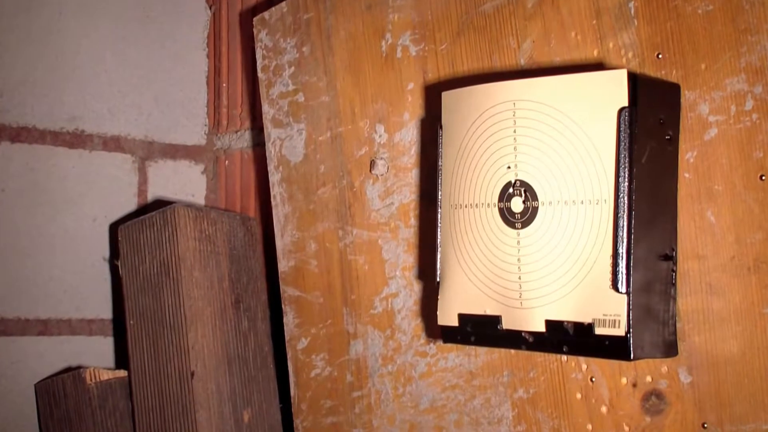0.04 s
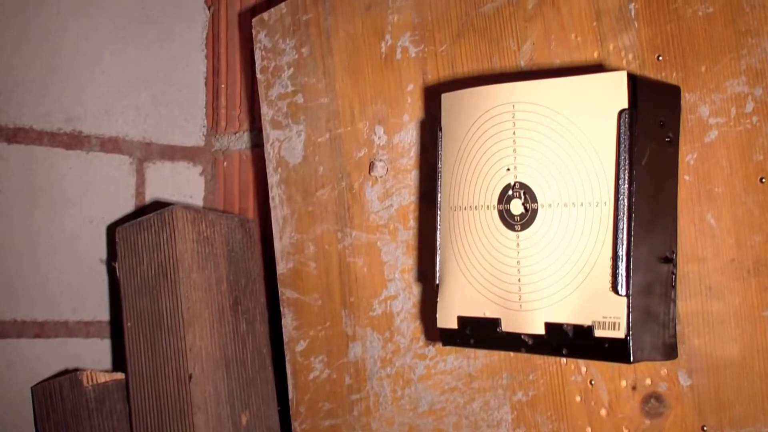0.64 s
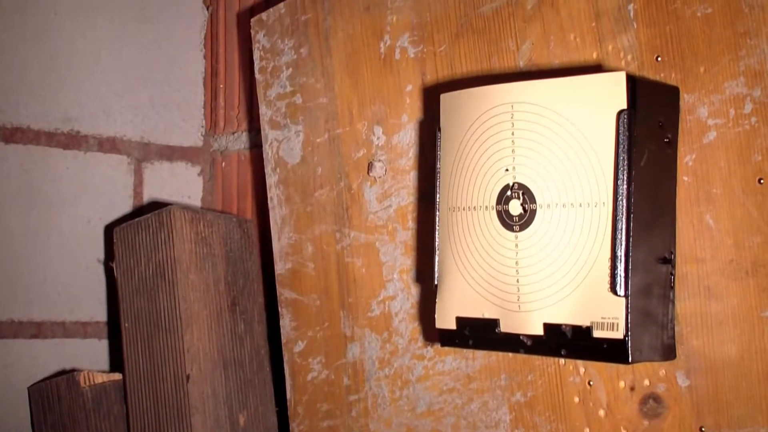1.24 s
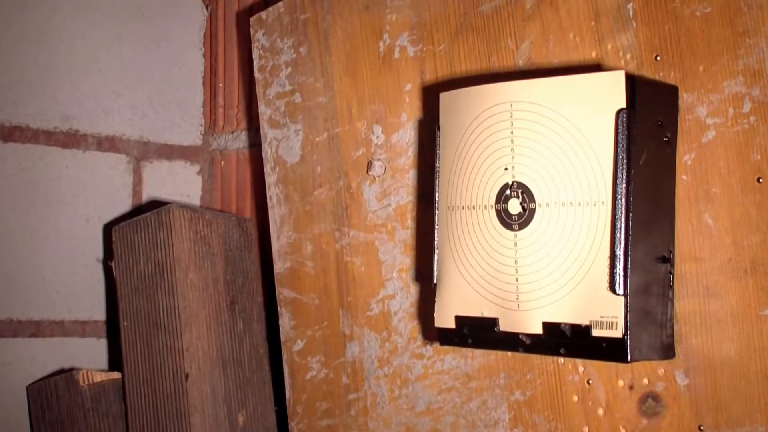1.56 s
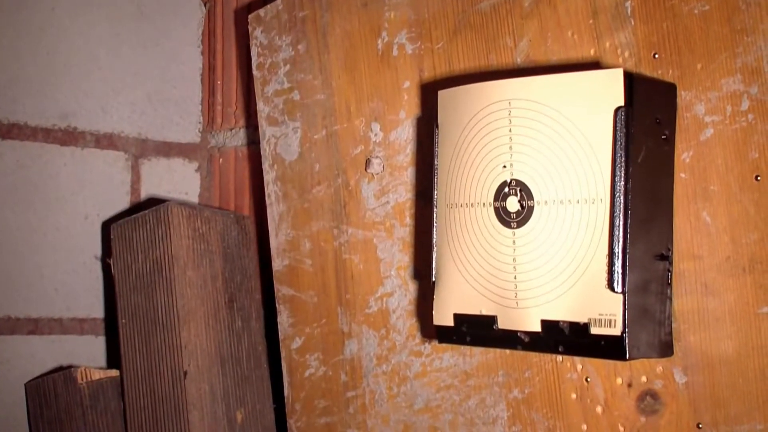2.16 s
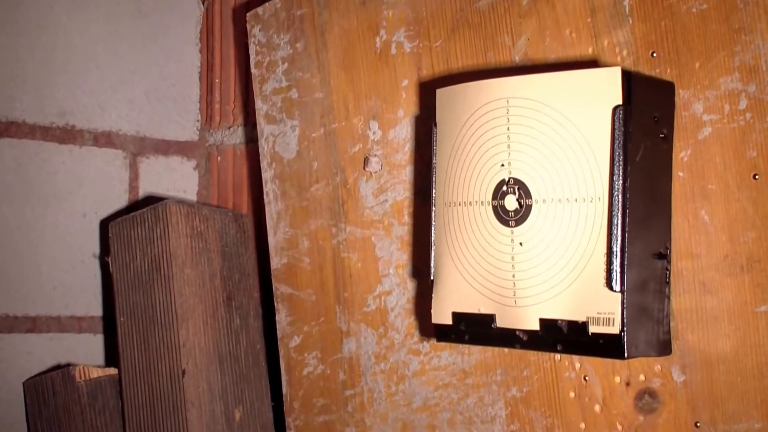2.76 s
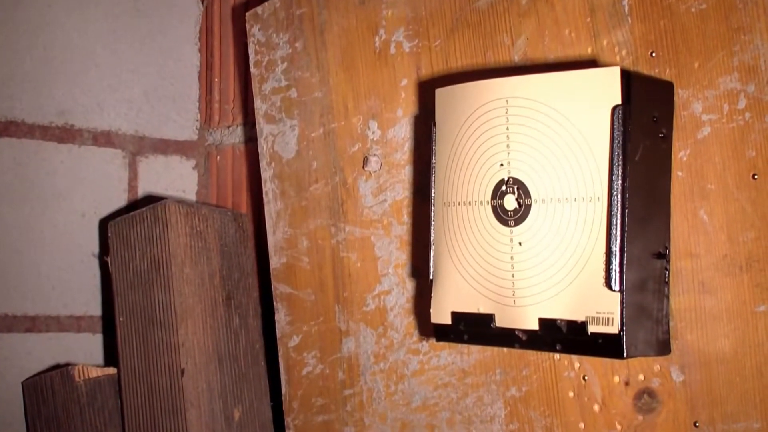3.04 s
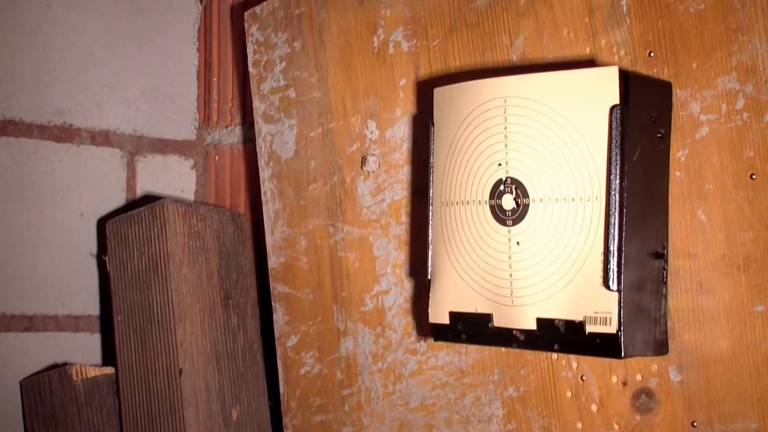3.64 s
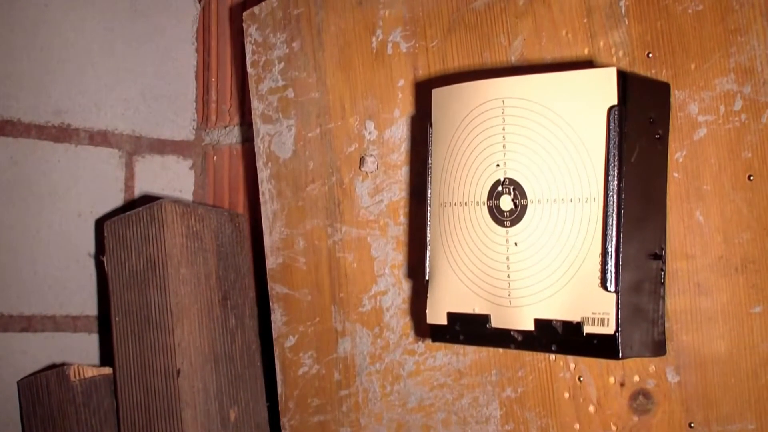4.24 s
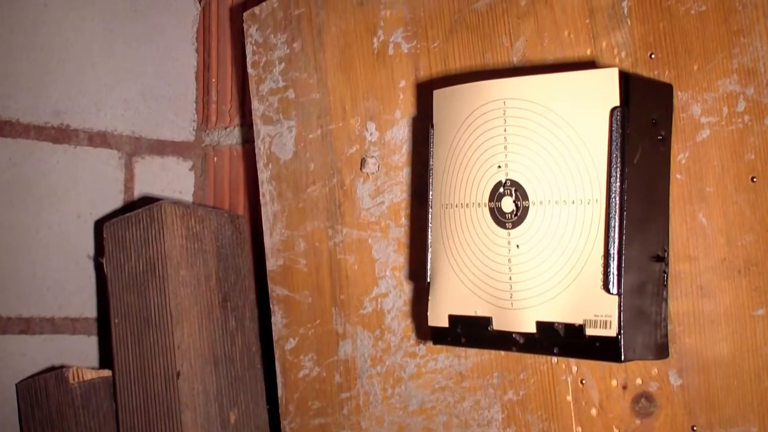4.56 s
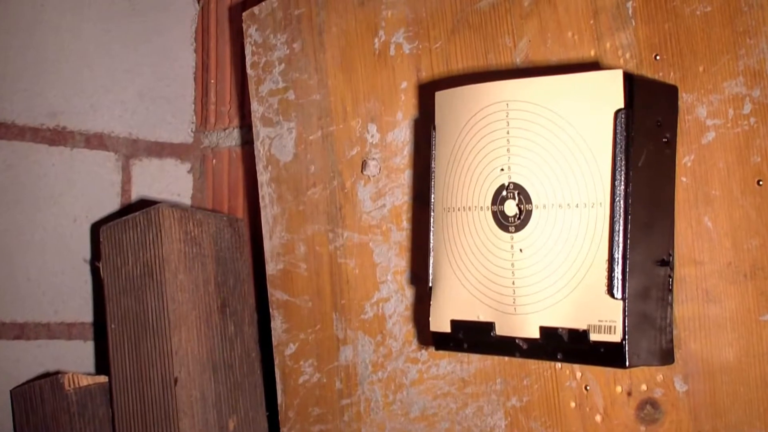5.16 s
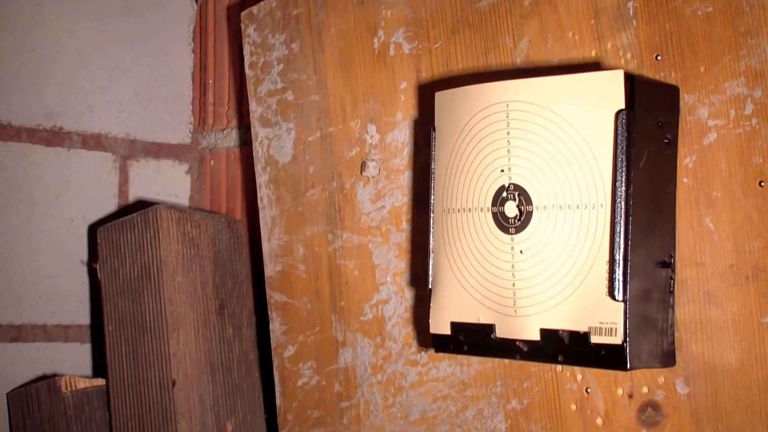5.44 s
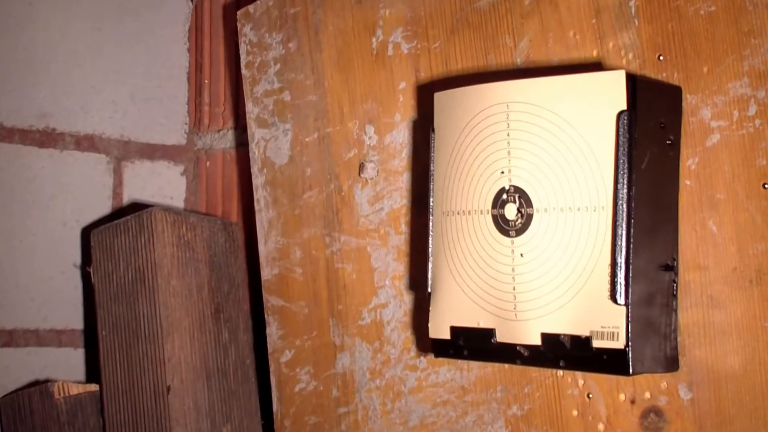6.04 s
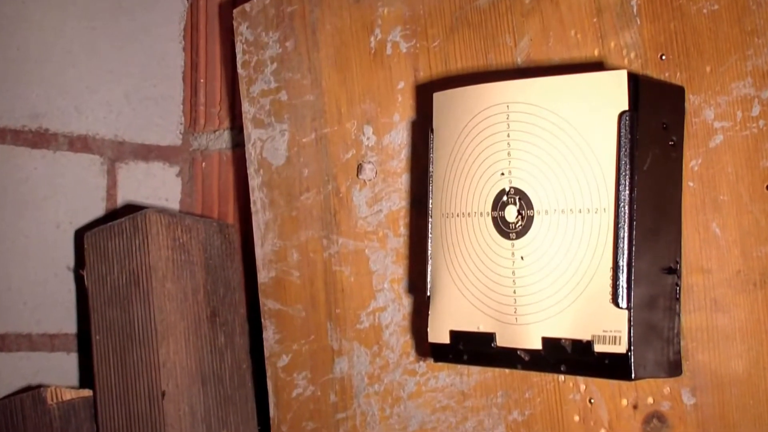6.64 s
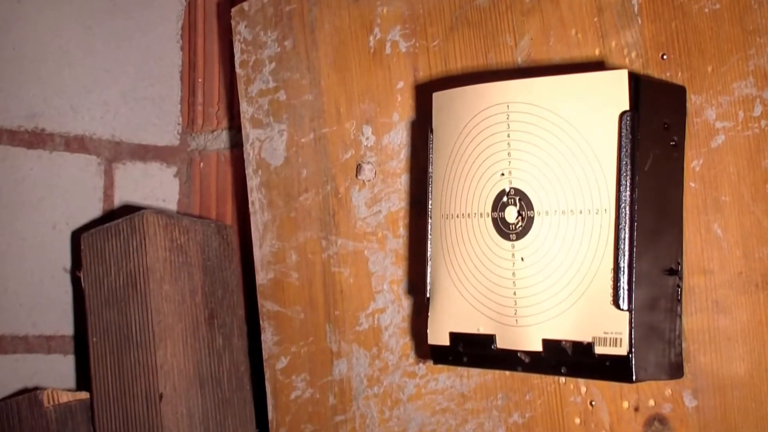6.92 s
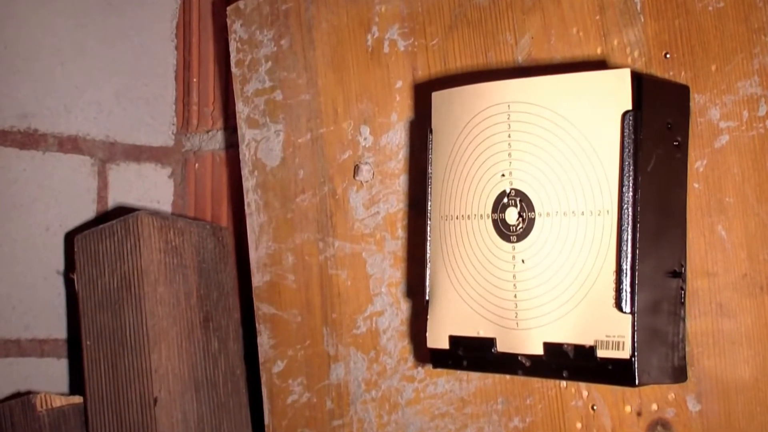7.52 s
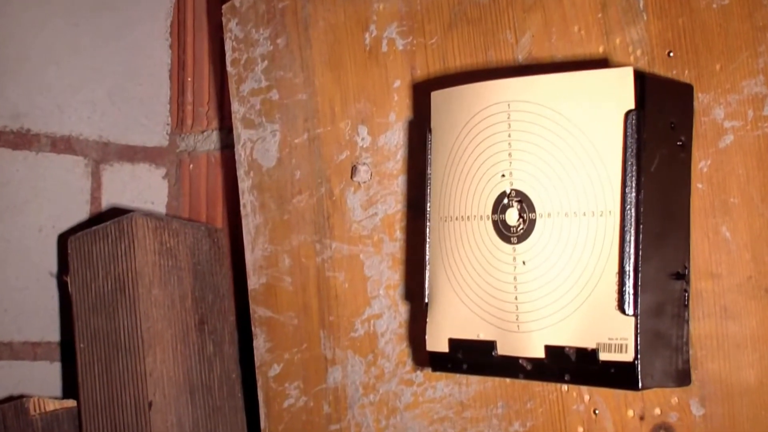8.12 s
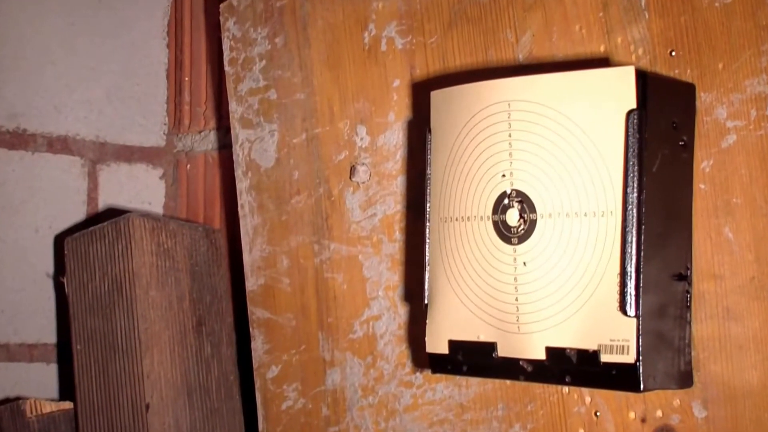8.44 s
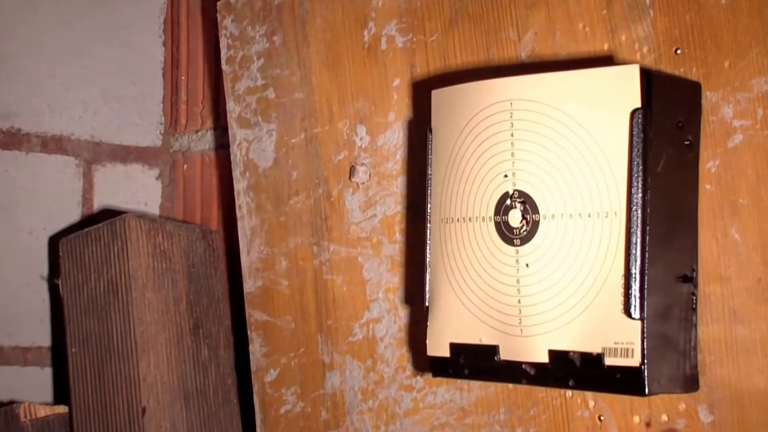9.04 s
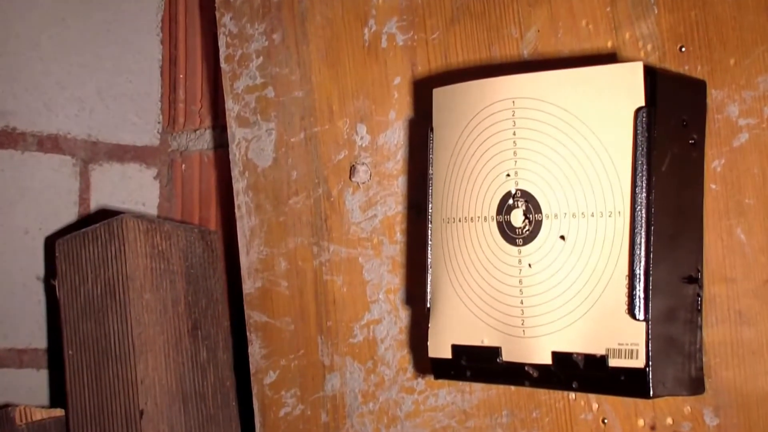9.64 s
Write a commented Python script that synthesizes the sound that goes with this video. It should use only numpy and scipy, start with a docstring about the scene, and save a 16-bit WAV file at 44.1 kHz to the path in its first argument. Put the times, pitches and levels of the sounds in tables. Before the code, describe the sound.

An air pistol fires six shots in a small brick room, heard close up, at about 0.5, 2.3, 4.3, 5.7, 7.6 and 9.1 seconds. Each begins with a small trigger click, then a sharp pop of gas merges with the loud, bright clang of a pellet striking a steel trap. The room rings briefly with a slight low boom. For about half a second after each hit, pellets bounce and rattle in the metal tray, only lightly after the third. Stray pellets tick on the hard floor and clack around the room from 1 to 1.8 seconds and again around 3 seconds, with a few small pings near 6 and 9.7 seconds. Dull knocks on wood, quieter than the shots, come at 4.8, 8.3 and 8.7 seconds. A faint low electrical hum and soft hiss run throughout.

```python
"""Gas pistol in a small brick room

Six shots: each is a trigger click, a pop of gas and a pellet slamming into a sheet-steel trap.
Pellets rattle in the trap and skip away over floor and furniture. Three dull knocks on wood sound
close by, over mains hum and hiss. A limiter ducks at every shot and lets the room's ring swell back."""
import sys
import numpy as np
from scipy.fft import rfft, irfft, next_fast_len
from scipy.io import wavfile
from scipy.ndimage import uniform_filter1d, minimum_filter1d

SR = 44100
rng = np.random.default_rng(int(sys.argv[2]) if len(sys.argv) > 2 else 0)


def generate_wav(signal):
    """Clip the signal to [-1, 1] and save it as 16-bit WAV at the path in sys.argv[1]."""
    frames = np.transpose(np.atleast_2d(signal))
    scaled = np.clip(frames, -1, 1) * 32767
    pcm = np.round(scaled).astype(np.int16)
    wavfile.write(sys.argv[1], SR, pcm)


N = 435708
TOP_HZ = 15900  # highest frequency kept
SPAN = 32768  # samples in one hit with its echo
T, HZ = np.arange(SPAN) / SR, np.fft.rfftfreq(SPAN, 1 / SR)  # that hit's times and frequencies

# the shots: trigger t/s, shot t/s, pop level/dB, ring of the trap's tray/dB
SHOTS = [(0.364, 0.5141, 17, 2.5), (2.231, 2.3207, 15.5, -2), (4.2, 4.2661, 16.5, -8.5),
         (5.653, 5.6856, 15.5, -7.5), (7.561, 7.609, 14.5, -7.5), (9.0835, 9.135, 18, -7.5)]
# tone of a hard bounce: f/Hz, level/dB
BOUNCE_TONE = [(100, -25), (400, -2.5), (1000, 5.5), (1500, 6), (3000, 5), (7000, 4), (12000, 1.5),
               (15500, 4.5)]
# tone of a bright tick: f/Hz, level/dB
TICK_TONE = [(200, -37), (1000, -17.5), (3000, -12), (7000, -8.5), (11000, -2.5), (15000, -3.5)]


def pistol():
    """The hammer opens the valve, gas pops from the ringing barrel, and the room booms."""
    # tone of the gas pop: f/Hz, level/dB
    pop_tone = [(30, 6.5), (70, 0.5), (120, -8.5), (190, -12.5), (250, 7.5), (350, -33), (480, -5.5),
                (700, -5), (1100, -0.5), (1500, -14.5), (2700, -8.5), (4000, -1), (8000, -8.5),
                (15000, -5.5)]
    out = np.zeros((2, N))
    gas = colour(along(pop_tone, HZ))
    barrel = colour(peaks([(2130, 0)], width_hz=380, lift_db=30))
    for _, s, db, _ in SHOTS:
        add(out, s - .002, amp(db - 23.5) * hit(gas, t60=.036, room_db=-15.5, rise=.00055))  # hammer
        add(out, s + .0003, amp(db + 4) * hit(barrel, t60=.039, room_db=-14, rise=.006))
        add(out, s + .00041, amp(db - 5) * hit(gas, t60=.084, room_db=-1, rise=.00031))
        add(out, s, amp(db - 18) * room_boom())
    return out


def trap_impacts(flight_s=.0182, level_db=25.5, scatter_db=1.5):
    """Each pellet slams into a new spot on the steel trap, so the ring differs a little each time."""
    # the trap's ringing notes: f/Hz, level/dB
    trap_notes = [(732, 1), (937, 5.5), (1130, -1.5), (1378, 6), (1712, -0.5), (1809, -9.5), (1906, -1.5),
                  (2003, 1), (2864, -3), (3370, -7), (3424, 8), (3639, -6.5), (3844, -2), (4016, 3),
                  (4490, 0), (4963, -1.5), (5028, 0), (6234, -9), (6309, -16.5), (6417, 9.5), (7418, -10),
                  (7784, -7.5), (8236, -3), (8355, -5), (8419, 0.5), (8484, -12), (9119, -10.5),
                  (10820, -0.5)]
    # tone of the impact: f/Hz, level/dB
    impact_tone = [(60, -43), (300, -5), (700, -7), (1400, 0.5), (3000, -3), (5000, -1.5), (8000, -5.5),
                   (11000, -4.5), (15000, -8)]
    out = np.zeros((2, N))
    high_ring = peaks([(7800, 4.7), (8400, 2.1), (10820, 2)], width_hz=90, lift_db=13)
    smack = colour(along(TICK_TONE, HZ) + high_ring)
    for _, shot_s, _, _ in SHOTS:
        notes = [(hz, db + scatter_db * rng.standard_normal()) for hz, db in trap_notes]
        steel = colour(along(impact_tone, HZ) + peaks(notes, width_hz=14 + HZ / 300, lift_db=6))
        s = shot_s + flight_s
        add(out, s, amp(level_db) * hit(steel, t60=.19, room_db=-9, rise=.0012))
        add(out, s, amp(level_db + 1.5) * hit(smack, t60=.086, room_db=-6.5))
        add(out, s, amp(level_db - 6.5) * hit(smack, t60=.12, room_db=-13.5))  # the sheets shimmer on
    return out


def trap_rattle(scatter_db=2):
    """Pellets bounce and roll in the trap's tray; harder bounces ring more and sound drier."""
    # clear bounces: t/s, strength/dB, bass/dB
    bounces = [(.6942, -3, -6), (.7387, -6.5, 13.5), (.7914, -7.5, 1.5), (0.825, 1.5, -10),
               (2.5182, 2, -25), (2.5615, -8, 9), (2.6087, 2, -4.5), (2.6234, -5, 3), (2.6498, 1, -28.5),
               (2.7458, 0, -14), (2.7852, -2.5, -11), (2.8021, -5.5, -3.5), (4.5554, -5.5, -3),
               (5.859, 7, -15.5), (5.9402, -5, 1.5), (5.9773, 10, -16), (6.0263, -0.5, -3),
               (6.0481, -1.5, -5.5), (6.1401, 0, -28.5), (7.8208, 5, -20.5), (7.8842, -4, -1.5),
               (7.9012, -6.5, -14), (9.3712, 6, -15), (9.4302, 1.5, -5.5), (9.4734, -1, 7.5),
               (9.54, -3, -2), (9.5818, -15, 7)]
    # the tray's ringing notes: f/Hz, level/dB
    tray_notes = [(920, -3), (1440, 5), (1800, -7), (2420, 1), (2780, -6), (3870, 4), (4350, -1),
                  (5150, -5), (6480, -4), (7550, 1), (7750, -4), (9950, 0), (11450, -3), (12750, 0)]
    out = np.zeros((2, N))
    for _, shot_s, _, ring_db in SHOTS:
        clear = [row for row in bounces if 0 < row[0] - shot_s < 1]
        rolling = [(shot_s + .14 + .2 * u, -21, 0) for u in rng.random(3)]  # soft random touches
        for s, db, bass_db in clear + rolling:
            # a square hit moves the whole sheet, a glancing one only its treble
            sheet = along(BOUNCE_TONE, HZ) + bass_db / (1 + (HZ / 3500) ** 2)
            lift_db = 13 + ring_db + .5 * min(db - 10, 0)  # soft touches hardly ring
            notes = [(hz, level + scatter_db * rng.standard_normal()) for hz, level in tray_notes]
            steel = colour(sheet + peaks(notes, width_hz=80 + HZ / 160, lift_db=lift_db))
            ring = hit(steel, t60=.037, room_db=-10.5 - .3 * db, rise=.001)
            snap = hit(steel, t60=.007, room_db=-20, rise=.0002)
            add(out, s, amp(db - 6.5) * ring)
            add(out, s + .001, amp(1.47 * db - 7) * snap)
    return out


def knocks():
    """Something hard cracks against a wooden board and can set the room booming."""
    # the knocks: t/s, level/dB, room boom/dB
    strikes = [(4.7925, 0, -15), (8.282, 0.5, -5.5), (8.7306, -4, -72)]
    # the board's ringing notes: f/Hz, level/dB
    wood_notes = [(250, 1.5), (595, -6), (690, -7), (850, -4), (1170, -2.5), (1460, -9.5)]
    # tone of a dull knock: f/Hz, level/dB
    knock_tone = [(60, -10), (170, -11), (260, -6), (600, 2), (1400, -1), (2000, -4.5), (2600, -15),
                  (3400, -14), (5000, -20.5), (8000, -22.5), (15000, -19.5)]
    out = np.zeros((2, N))
    wood = colour(along(knock_tone, HZ) + peaks(wood_notes, width_hz=34, lift_db=6.5))
    crack = colour(along(BOUNCE_TONE, HZ))
    for s, db, boom_db in strikes:
        add(out, s, amp(db + .5) * hit(wood, t60=.024, room_db=-8.5))
        add(out, s, amp(db - 18.5) * hit(crack, t60=.01, room_db=-23, rise=.0001))
        add(out, s, amp(boom_db) * room_boom())
    return out


def trigger():
    """The trigger catches twice before each shot: a dull touch, then a sharp click."""
    # the two catches: lead before the trigger time/s, level/dB, bass/dB
    catches = [(0.015, -38, 12), (0.0029, -11.5, -8)]
    # tone of the click: f/Hz, level/dB
    click_tone = [(200, -46.5), (700, -10), (1200, 1.5), (1800, -2.5), (2600, 3.5), (4000, 2.5), (6000, -2),
                  (10000, -1), (15000, -9.5)]
    out = np.zeros((2, N))
    for lead_s, db, bass_db in catches:
        click = colour(along(click_tone, HZ) + bass_db / (1 + (HZ / 3000) ** 2))
        for s, *_ in SHOTS:
            add(out, s - lead_s, amp(db) * hit(click, t60=.01, room_db=-1))
    return out


def bright_tick():
    """The filter for a tiny, hard contact with a very high ring."""
    return colour(along(TICK_TONE, HZ) + peaks([(12800, 0)], width_hz=1200, lift_db=8))


def floor_skips(first_hop_s=.064, shrink=.85, first_loss_db=9.5):
    """Stray pellets tick on the hard floor; one skips on in ever shorter, softer hops."""
    # the landings: t/s, level/dB, echo/dB, number of skips that follow
    landings = [(1.072, -28.5, -17.5, 0), (1.091, -7.5, -18.5, 0), (1.1885, -31, -15.5, 0),
                (2.8314, -6.5, -19, 0), (2.9153, -12.5, -22, 0), (2.9316, -4, -15.5, 0),
                (3.0621, -10.5, -11.5, 3), (6.337, -29, -18.5, 0)]
    out = np.zeros((2, N))
    tick = bright_tick()
    for s, db, room_db, skips in landings:
        for k in range(round(skips) + 1):
            gain = amp(db - first_loss_db * np.sqrt(k))
            add(out, s, gain * hit(tick, t60=.0085, room_db=room_db, rise=.0001))
            s += first_hop_s * shrink ** k
    return out


def pings_and_clacks():
    """The pistol's parts ping twice before the first shot; later, stray pellets clack around the room."""
    # the pings and clacks: t/s, level/dB, ring f/Hz, ring strength/dB
    strikes = [(.438, -28.5, 2140, 16), (.491, -22.5, 2170, 20), (1.24, -18.5, 6200, 17),
               (1.333, -19, 1930, 2), (1.336, -24, 805, 8), (1.477, -23, 1170, 10), (1.617, -32, 3000, 6.5),
               (1.63, -19, 3050, 13.5), (1.754, -32.5, 3020, 5.5), (1.799, -21.5, 2010, 10.5),
               (2.763, -26, 642, 28.5), (2.8, -23, 860, 17), (4.05, -46, 2430, 16),
               (4.985, -43.5, 2800, 18), (5.194, -45.5, 1200, 6), (5.878, -19, 526, 20),
               (6.005, -23, 2370, 18.5), (6.701, -42, 2300, 18), (9.635, -23, 1700, -8),
               (9.786, -35.5, 1970, 11.5)]
    # their shared tone: f/Hz, level/dB
    tone = [(100, -21.5), (300, 3), (800, 2.5), (2000, 4), (5000, -2), (8000, -6), (12000, -24),
            (16000, -27.5)]
    out = np.zeros((2, N))
    tick = bright_tick()
    for s, db, ring_hz, ring_db in strikes:
        ring = peaks([(ring_hz, ring_db)], width_hz=5 * np.sqrt(ring_hz), lift_db=.5)
        # smaller, higher-pitched things and harder hits are brighter
        treble_db = 17 * np.log2(ring_hz / 2000) + .5 * (db + 27.5)
        body = colour(along(tone, HZ) + treble_db * HZ / (HZ + 5000) + ring)
        add(out, s, amp(db) * hit(body, t60=.096, room_db=-4))
        add(out, s, amp(db - 36 + .9 * treble_db) * hit(tick, t60=.037, room_db=-1.5))
    return out


def rocking(start_s=5.055, end_s=5.48, period_s=.04):
    """Something small rocks for a moment, making faint, even taps on one note."""
    out = np.zeros((2, N))
    body = colour(peaks([(2030, 0)], width_hz=120, lift_db=35))
    for s in np.arange(start_s, end_s, period_s):
        add(out, s, amp(-47) * hit(body, t60=.051, room_db=-20, rise=.004))
    return out


def hum_and_hiss(mains_hz=50):
    """Mains power hums at whole multiples of its frequency, over a soft, even hiss."""
    # the hum's notes: rough f/Hz, level/dB
    hum_notes = [(48.4, -32), (150.7, -41.5), (247.6, -51.5), (349.9, -74), (452.2, -59), (549.1, -69)]
    # tone of the hiss: f/Hz, level/dB
    hiss_tone = [(25, 2.5), (45, 0.5), (80, 4.5), (200, -2), (450, -6.5), (1000, -12), (2000, -16),
                 (4000, -18), (8000, -22.5), (15000, -25)]
    phase = 2 * np.pi * mains_hz * np.arange(N) / SR
    hum = sum(amp(db) * np.sqrt(2) * np.sin(round(hz / mains_hz) * phase + rng.uniform(0, 2 * np.pi))
              for hz, db in hum_notes)
    hiss = filtered(rng.standard_normal((2, N)), lambda hz: amp(along(hiss_tone, hz)) * (hz < TOP_HZ))
    return np.outer([1, 0], hum) + amp(-49) * hiss / hiss.std()


def room_boom(hz=64, t60=.5, rise=.2):
    """The room's lowest note builds up between the walls and rings on."""
    wave = 2 * np.sin(2 * np.pi * hz * T) * fade(t60, rise)
    return np.outer([1, 0], wave)


def room_echo(size=256):
    """Many wall reflections blur into noise whose treble dies away first."""
    # the echo's length: f/Hz, time to fade by 60 dB/s
    fade_times = [(60, 0.53), (250, 0.34), (1000, 0.34), (3000, 0.33), (8000, 0.24), (15000, 0.14)]
    hop = size // 2
    t, hz = np.arange(SPAN // hop)[:, None] * hop / SR, np.fft.rfftfreq(size, 1 / SR)
    decay = np.exp(-np.log(1000) * t / along(fade_times, hz))
    spectra = rfft(rng.standard_normal((2, len(t), size))) * decay
    slices = irfft(spectra) * np.sin(np.pi * np.arange(size) / size)
    joined = slices[..., hop:] + np.roll(slices[..., :hop], -1, axis=1) * (t < t[-1])
    return joined.reshape(2, SPAN) * (1 - np.exp(-T / .0035))


def hit(body, t60, room_db, rise=.00033):
    """A burst of noise through a body's filter, plus its echo; the rows are (mid, side)."""
    shape = fade(t60, rise)
    direct = irfft(rfft(rng.standard_normal((2, SPAN)) * shape) * body)
    direct *= np.linalg.norm(shape) / np.linalg.norm(direct, axis=1, keepdims=True)
    return direct + amp(room_db) * irfft(rfft(room_echo()) * body)


def colour(db):
    """Turn a dB curve into a filter of average power 1 that rings only after it is struck."""
    cepstrum = irfft(np.log(amp(db)))
    forward_only = np.r_[1, np.full(SPAN // 2 - 1, 2), np.zeros(SPAN // 2)]
    response = np.exp(rfft(cepstrum * forward_only))
    return response / np.sqrt(np.mean(abs(response[HZ < TOP_HZ]) ** 2))


def peaks(notes, width_hz, lift_db):
    """The dB that ringing notes add to a smooth tone curve."""
    power = sum(amp(db + lift_db) ** 2 / (1 + (2 * (HZ - hz) / width_hz) ** 2) for hz, db in notes)
    return 10 * np.log10(1 + power)


def fade(t60, rise):
    """Swell over about rise seconds while dying away by 60 dB every t60 seconds."""
    return np.exp(-np.log(1000) * T / t60) * (1 - np.exp(-T / rise))


def amp(db):
    """Turn decibels into a gain."""
    return 10 ** (np.asarray(db) / 20)


def along(points, hz):
    """Read between (f/Hz, value) points on a pitch-like log scale."""
    f, values = np.transpose(points)
    return np.interp(np.log(hz + 1), np.log(f + 1), values)


def add(track, s, sound):
    """Mix a sound into the track at s seconds."""
    part = track[:, round(s * SR):][:, :SPAN]
    part += sound[..., :part.shape[1]]


def filtered(x, gain):
    """Turn each frequency of x up or down by gain(hz)."""
    size = next_fast_len(x.shape[-1] + 4096)
    return irfft(rfft(x, size) * gain(np.fft.rfftfreq(size, 1 / SR)), size)[..., :x.shape[-1]]


def scene():
    """Two close microphones hear the bass alike (mid) and the treble more apart (side)."""
    # stereo width: f/Hz, side over mid/dB
    width = [(100, -9), (400, -9.5), (1000, -11.5), (2500, -10), (5000, -3.5), (9000, -1)]
    # stereo balance: f/Hz, left over right/dB
    balance = [(50, -2.5), (70, -10), (150, -1.5), (400, -3), (1200, -2), (2500, 0), (8000, -1.9),
               (14000, -1)]
    mix = trigger() + pistol() + trap_impacts() + trap_rattle()
    mix += floor_skips() + pings_and_clacks() + rocking() + knocks() + hum_and_hiss()
    mid, side = filtered(mix, lambda hz: amp(np.outer([0, 1], along(width, hz))))
    left_right = np.array([mid + side, mid - side])
    return filtered(left_right, lambda hz: amp(np.outer([.5, -.5], along(balance, hz))))


def limiter(x, ceiling_db=-4, attack_s=.00068, hold_s=.058, release_db_per_s=200):
    """The volume drops at once on a loud sound, waits, then climbs back."""
    size, wait = int(attack_s * SR) | 1, int(hold_s * SR) | 1
    sensed = uniform_filter1d(x, size=2, axis=1)  # reacts less to treble
    power = abs(uniform_filter1d(np.mean(sensed ** 2, axis=0), size, origin=size // 4)) + 1e-12
    gain_db = np.minimum(0, ceiling_db - 10 * np.log10(power))
    held = minimum_filter1d(gain_db, wait, origin=wait // 2)
    climb = release_db_per_s * np.arange(N) / SR
    return x * amp(np.minimum.accumulate(held - climb) + climb)


def record(dry):
    """Limit the sound, chop off peaks that slip through and remove the highest treble."""
    return filtered(np.clip(limiter(dry), -1, 1), lambda hz: hz < TOP_HZ)


dry = scene()
out = record(dry)
generate_wav(out)
```